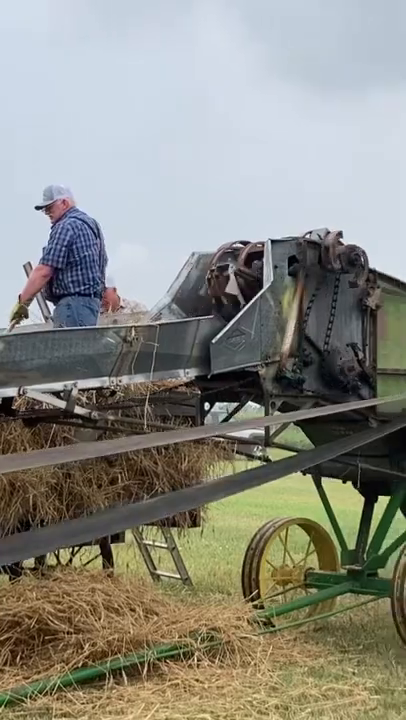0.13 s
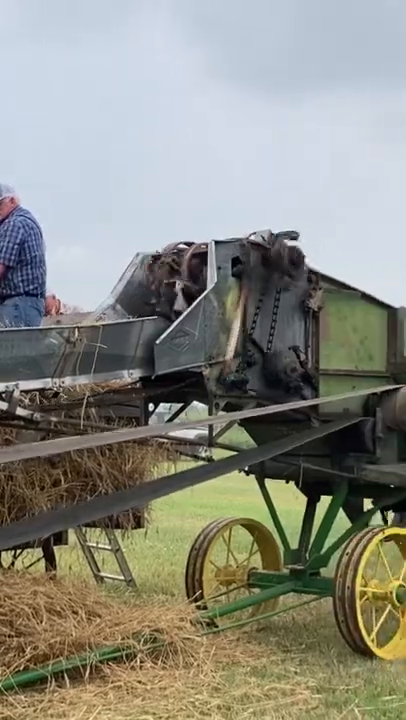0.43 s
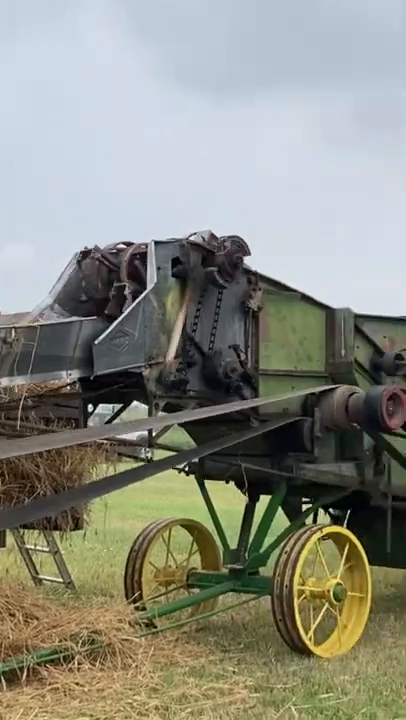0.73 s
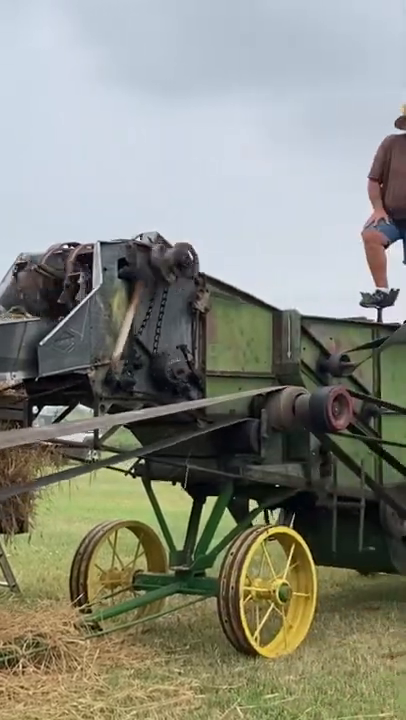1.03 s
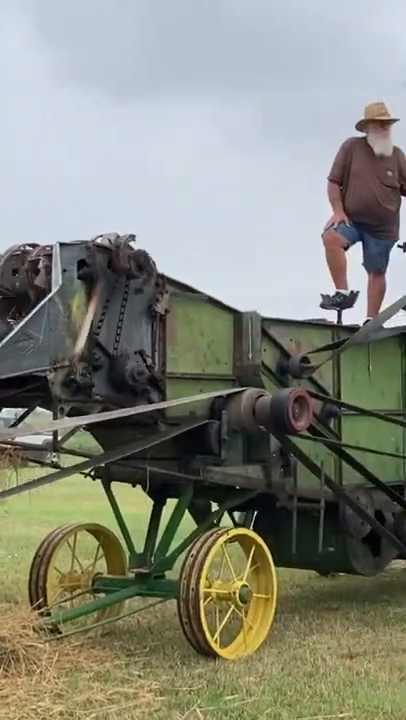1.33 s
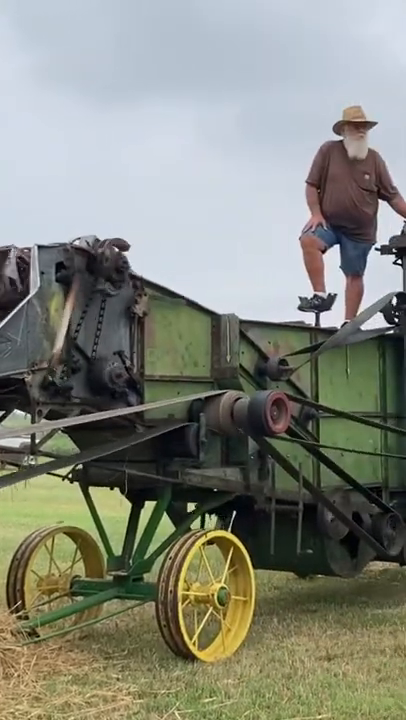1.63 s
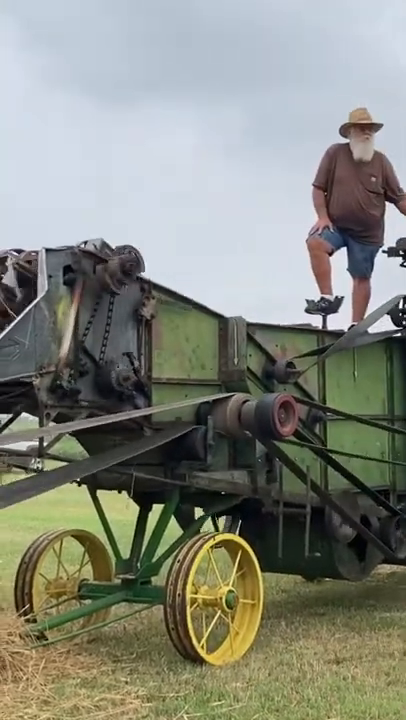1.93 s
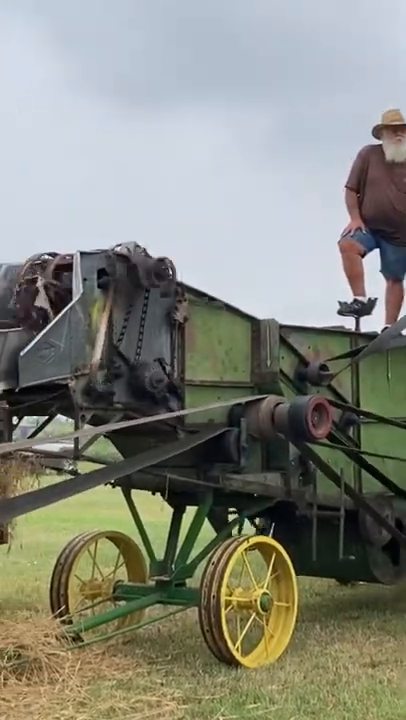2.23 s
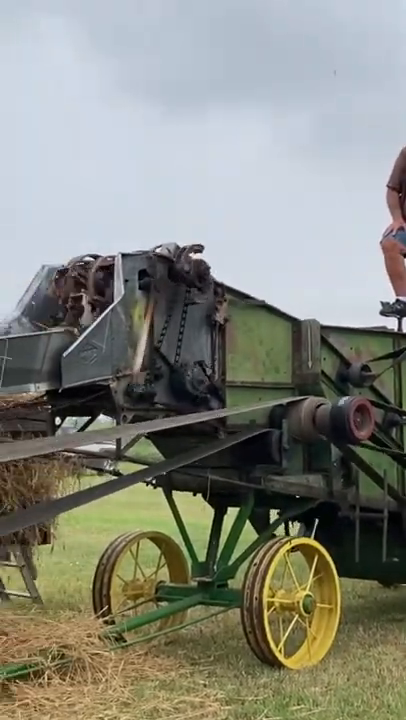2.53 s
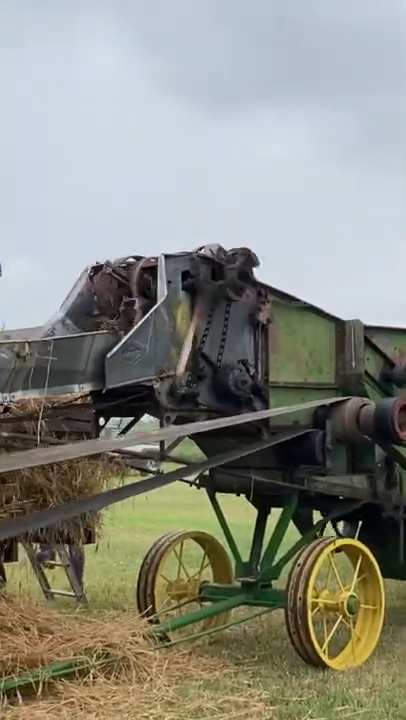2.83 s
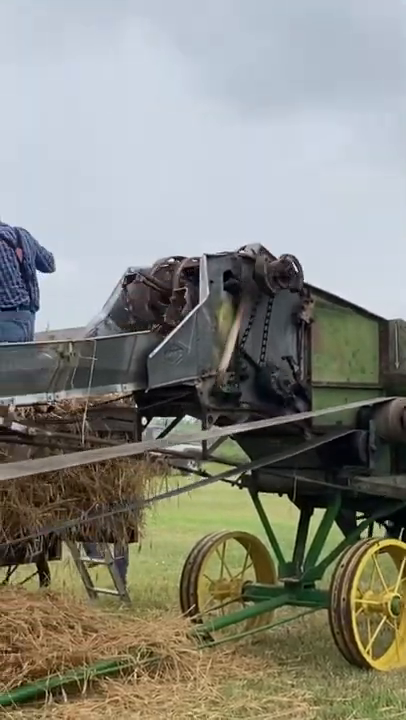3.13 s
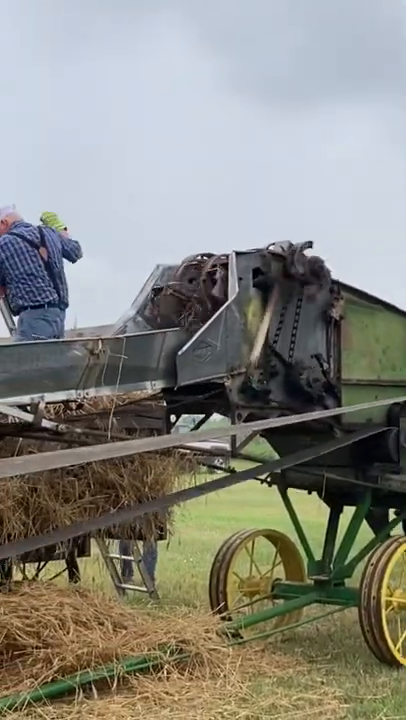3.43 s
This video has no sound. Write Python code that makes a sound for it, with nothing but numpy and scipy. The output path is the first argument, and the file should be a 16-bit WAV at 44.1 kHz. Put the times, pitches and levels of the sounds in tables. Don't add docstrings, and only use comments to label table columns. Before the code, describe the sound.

A threshing machine roars steadily in an open field, low drone throbbing, loose metal rattling, clumps knocking on panels, straw hissing, and a slow engine puffing in uneven pairs; close stereo handheld microphone.

```python
import sys
import numpy as np
from scipy import signal
from scipy.fft import rfft, irfft, next_fast_len
from scipy.io import wavfile

SR = 44100
rng = np.random.default_rng(int(sys.argv[2]) if len(sys.argv) > 2 else 0)


def convert_level_to_amplitude(level_db):
    exponent = np.asarray(level_db, float) / 20
    return 10 ** exponent


def put_to_file(sound):
    columns = np.atleast_2d(sound).T
    safe = np.clip(columns, -1, 1)
    whole_steps = np.round(safe * 32767)
    wavfile.write(sys.argv[1], SR, whole_steps.astype(np.int16))


N = 157878

# (frequency [Hz], width [Hz], level [dB])
PIPE_MODES = [(59.3, 14, -23.5), (100, 45, -35), (40, 14, -45)]
# (time [s], peak [dB])
BARK_EVENTS = [(0.0348, -37), (0.0493, -29), (0.1497, -22), (0.18, -26), (0.2748, -25), (0.3055, -22),
               (0.401, -22), (0.4279, -25), (0.5257, -22), (0.5603, -25), (0.6514, -25), (0.6828, -22.5),
               (0.78, -24.5), (0.8111, -28), (0.9046, -25.5), (0.9394, -21), (1.0311, -24), (1.0635, -26),
               (1.1174, -40), (1.1598, -25), (1.1892, -25), (1.2835, -26), (1.3136, -23.5), (1.4102, -26),
               (1.444, -27.5), (1.506, -34), (1.5389, -28), (1.5704, -30), (1.79, -28), (1.8213, -25),
               (1.953, -33), (2.0463, -26), (2.0766, -25), (2.2039, -23), (2.2965, -21), (2.333, -27),
               (2.4272, -24), (2.4554, -22), (2.5551, -27), (2.585, -24.5), (2.6808, -20), (2.7157, -25),
               (2.8093, -23.5), (2.839, -27), (2.9308, -26), (2.968, -25), (3.06, -27), (3.0914, -33),
               (3.1895, -25.5), (3.2181, -28), (3.2406, -29), (3.3169, -21), (3.3473, -21), (3.4406, -25.5),
               (3.4705, -23.5), (3.5428, -20.5)]
# (frequency [Hz], width [Hz], level [dB])
STACK_MODES = [(375, 320, 6), (1533, 74, 0.5), (1917, 58, 2.5), (2820, 390, 5), (3770, 850, -1)]
# (time [s], rate [Hz], level [dB])
DRUM_SPEED = [
    (0, 60.33, 0),
    (.5, 60.25, 1.5),
    (1.0, 59.9, 0),
    (1.3, 58.9, -3),
    (1.55, 59.7, 0),
    (2.2, 59.8, -1.5),
    (3.6, 59.93, -1.5),
]
# (time [s], rate [Hz], level [dB])
BEATER_SPEED = [(0, 62.42, -3), (3.6, 61.93, 0)]
# (time [s], rate [Hz], level [dB])
FAN_SPEED = [(0, 64.45, -7), (.9, 64.0, -1), (2, 63.88, .5), (3.6, 63.72, -.5)]
# (multiple [ratio], peak [dB]); negative multiple = inverted
DRUM_OVERTONES = [(1, -19.5), (-2, -25.5), (4, -35), (-8, -42)]
BEATER_OVERTONES = [(1, -30), (2, -30), (3, -36)]
FAN_OVERTONES = [(1, -18)]
# (frequency [Hz], density [dB per Hz])
ROAR_SPECTRUM = [(30, -23), (45, -9), (80, -6.5), (281, -15), (520, -21.5), (660, -27.5), (3100, -32),
                 (7000, -36)]
# (frequency [Hz], width [Hz], level [dB])
PANEL_MODES = [(98.3, 38, -31.5), (214.6, 26, -42.5), (391.7, 62, -35), (477, 55, -38.5), (559, 32, -45),
               (950, 344, -37), (1056, 13, -55), (1646, 700, -40.5), (3440, 330, -45), (4150, 1560, -41.5)]
# (frequency [Hz], power share [0-1])
PORT_LIKENESS = [(60, 0.8), (300, 0.91), (550, 0.67), (900, 0.39), (2900, 0.17), (4500, 0.31), (5700, 0.28),
                 (7000, 0.1)]
# (time [s], factor [ratio])
MIC_FACING = [(0, .7), (.6, 1.1), (.95, 1.15), (1.1, .3), (2.0, .3), (2.3, 1.15), (2.6, 1.1), (2.8, .8),
              (3.58, .7)]
# (frequency [Hz], difference [dB])
LEFT_LEAN = [(60, -2), (200, -.5), (700, 1.5), (2400, 0), (4400, -.5), (8000, 0)]
# (time [s], peak [dB], pitch [Hz])
KNOCK_EVENTS = [(0.035, -19, 482), (0.153, -10, 415), (0.312, -19, 350), (0.517, -16.5, 401),
                (0.59, -13.5, 358), (0.692, -21, 355), (0.765, -28, 377), (0.851, -21, 382),
                (1.063, -14, 390), (1.188, -17, 358), (1.217, -29, 423), (1.266, -26, 479),
                (1.336, -16, 476), (1.391, -21, 331), (1.427, -17, 366), (1.481, -18, 401),
                (1.525, -15, 342), (1.56, -29, 396), (1.6, -13, 398), (1.818, -16.5, 380),
                (1.903, -19, 301), (2.062, -21, 471), (2.116, -22, 393), (2.172, -16, 409),
                (2.217, -19, 380), (2.275, -54, 382), (2.329, -15, 466), (2.372, -24, 393),
                (2.432, -24, 398), (2.546, -23, 374), (2.7, -16, 361), (2.763, -20, 301), (2.837, -16, 463),
                (2.939, -15.5, 401), (3.058, -24, 409), (3.124, -17, 450), (3.195, -18, 530),
                (3.311, -23, 331), (3.342, -22, 401), (3.516, -27, 404)]
# (pitch multiple [ratio], level [dB], t60 [s])
HOUSING_MODES = [(1.045, 2, 0.13), (1.22, 1, 0.017), (1, -17, 0.058), (2.8, -20, .03)]
# (time [s], half length [s], frequency [Hz], peak [dB])
SQUEAL_EVENTS = [(0.134, .03, 685, -35), (0.194, .03, 1226, -40), (.3, .04, 1057, -40),
                 (.55, .04, 930, -37), (1.045, 0.045, 712, -40.5), (2.327, 0.034, 909, -38),
                 (2.546, 0.07, 1050, -41), (2.88, 0.034, 563, -30.5), (2.88, .03, 1087, -38),
                 (3.19, 0.022, 530, -31), (3.412, 0.052, 720, -36)]
# (time [s], level [dB])
STRAW_FLOW = [(0.04, -30.5), (0.54, -33.5), (0.61, -32), (0.68, -35), (0.75, -31.5), (0.82, -33),
              (1.33, -30.5), (1.34, -32.5), (1.72, -29), (1.81, -33.5), (1.82, -31), (2.57, -32.5),
              (2.63, -29), (2.83, -32.5), (3.47, -32.5), (3.5, -31)]
# (frequency [Hz], density [dB per Hz])
CHAFF_SPECTRUM = [(3000, -9), (5500, -10), (7000, -4.5), (8000, 9), (9000, 3), (10300, 8.5), (12500, -2.5),
                  (16000, 1)]
# (time [s], peak [dB])
SNAP_EVENTS = [(0.034, -30), (0.2873, -19), (0.3466, -28), (0.393, -26), (0.456, -18), (0.4958, -18),
               (0.6031, -21), (0.621, -21), (0.6465, -9), (0.6918, -18), (0.7313, -20), (0.9423, -18),
               (0.9647, -32), (1.0126, -47), (1.0366, -14), (1.1568, -9), (1.2331, -19), (1.289, -21),
               (1.3129, -16), (1.3608, -19), (1.5444, -29), (1.8243, -21), (1.9071, -11), (2.1061, -46),
               (2.3381, -33), (2.3576, -38), (2.398, -30), (2.4264, -16), (2.4538, -21), (2.4863, -25),
               (2.6175, -30), (2.9203, -17), (2.9722, -41), (3.1024, -25), (3.1792, -24), (3.279, -15),
               (3.3623, -25), (3.4057, -23), (3.4476, -5)]

CYCLE_HZ, FIRST_FIRING_S, SECOND_CYLINDER_SHARE = 7.889, .0228, .25
BARK_LEAD_S, BARK_RISE_S, BARK_FALL_S, BARK_TRIM_DB = .002, .0015, .005, -2.5
DRUM_TURN, BEATER_TURN, FAN_TURN, WAVER_DB = -.12, .06, .15, .4
ROAR_DB, PORT_LAG_S, LAG_FROM_HZ = -23.5, .00046, 1000
KNOCK_TRIM_DB = -8.0
RATTLES_PER_S, RATTLE_DB, RATTLE_CYCLES = 900, -41, 45.0
SQUEAL_SAG_PER_S = .05
CHAFF_LAG_S, CHAFF_TRIM_DB, CHAFF_LIKENESS = .000219, 3, .9
GRAINS_PER_S, GRAIN_DB, GRAIN_SPREAD_DB = 1500, -7, 3.0
SWISH_S, SWISH_LENGTH_S, SWISH_DB = 3.544, .012, 2.5
SNAP_TRIM_DB, SNAP_TOP_DB, SNAP_RISE_S, SNAP_FALL_S = -11, -17, .0012, .0025
BODY_FOLLOWS_FLOW = .47
START_S = .0345


def in_time(rows, axis=1):
    table = np.array(rows)
    return np.interp(np.arange(N) / SR, table[:, 0], table[:, axis])


def at_hz(points, hz):
    table = np.array(points)
    return np.interp(np.log(hz), np.log(table[:, 0]), table[:, 1])


def rms_one(x):
    return x / np.sqrt(np.mean(x ** 2) + 1e-20)


def drift(rate_hz):
    r = np.exp(-80 * np.pi * rate_hz / SR)
    white = rng.standard_normal(N // 40 + 2002)
    slow = signal.lfilter([1], [1, -2 * r, r * r], white)[2000:]
    return np.interp(np.arange(N) / 40, np.arange(len(slow)), rms_one(slow - slow.mean()))


def resonate(x, hz, width_hz):
    r = np.exp(-np.pi * width_hz / SR)
    poles = [1, -2 * r * np.cos(2 * np.pi * hz / SR), r * r]
    return signal.lfilter([(1 - r * r) / 2, 0, (r * r - 1) / 2], poles, x + 1e-18)


def ring(strikes, hz, t60_s):
    r, w = convert_level_to_amplitude(-60 / (t60_s * SR)), 2 * np.pi * hz / SR
    return signal.lfilter([0, np.sin(w)], [1, -2 * r * np.cos(w), r * r], strikes + 1e-18)


def clicks(times_s, sizes):
    return np.bincount((np.asarray(times_s) * SR).astype(int), sizes, N + SR)[:N]


def puffs(train, rise_s, fall_s):
    t = np.arange(SR // 20) / SR
    shape = (1 - np.exp(-t / rise_s)) * np.exp(-t / fall_s)
    return signal.fftconvolve(train, shape / shape.max())[:N]


def late(x, lag_s):
    size = next_fast_len(N + 64)
    hz = np.arange(size // 2 + 1) / size * SR
    return irfft(rfft(x, size) * np.exp(-2j * np.pi * hz * lag_s), size)[:N]


def likeness(hz):
    facing = in_time(MIC_FACING) if hz > LAG_FROM_HZ else 1
    return np.clip(at_hz(PORT_LIKENESS, hz) * facing, 0, 1)


def bands(spectrum, low_hz, high_hz, count, patchy_db, rate_hz):
    edges, together = np.geomspace(low_hz, high_hz, count + 1), drift(rate_hz)
    white = rng.standard_normal((2, 3, N))
    for k, (low, high) in enumerate(zip(edges, edges[1:])):
        hz = np.sqrt(low * high)
        gain = convert_level_to_amplitude(at_hz(spectrum, hz) + patchy_db * (0.69 * together + drift(rate_hz)))
        band = signal.butter(2, [low, high], "band", fs=SR, output="sos")
        yield hz, gain * signal.sosfilt(band, white[k % 2])


def squeals():
    t, out = np.arange(N) / SR, np.zeros(N)
    for s, half_s, hz, db in SQUEAL_EVENTS:
        swell = np.exp(-.5 * ((t - s) / half_s) ** 2)
        out += convert_level_to_amplitude(db) * swell * np.sin(2 * np.pi * hz * (t - SQUEAL_SAG_PER_S * (t - s) ** 2))
    return out


def chaff(flow_db):
    noises = [b for _, b in bands(CHAFF_SPECTRUM, 2476, 18640, count=10, patchy_db=1.5, rate_hz=80.0)]
    hiss = rms_one(sum(noises))
    sizes = convert_level_to_amplitude(GRAIN_SPREAD_DB * np.minimum(rng.exponential(1, N), 5)) * rng.choice([-1, 1], N)
    hits = rng.random(N) < GRAINS_PER_S * convert_level_to_amplitude(4.0 * drift(10.0)) / SR
    bright = signal.butter(2, [5500, 16000], "band", fs=SR, output="sos")
    grains = convert_level_to_amplitude(GRAIN_DB) * rms_one(signal.sosfilt(bright, sizes * hits))
    swish = convert_level_to_amplitude(SWISH_DB) * np.exp(-((np.arange(N) / SR - SWISH_S) / SWISH_LENGTH_S) ** 4)
    level = convert_level_to_amplitude(flow_db + CHAFF_TRIM_DB) * (1 + swish)
    s, db = np.transpose(SNAP_EVENTS)
    train = clicks(s, convert_level_to_amplitude(np.minimum(db, SNAP_TOP_DB) + SNAP_TRIM_DB))
    snaps = puffs(train, SNAP_RISE_S, SNAP_FALL_S) * hiss[0]
    common = level * (np.sqrt(CHAFF_LIKENESS) * hiss[0] + grains) + snaps
    apart = level * np.sqrt(1 - CHAFF_LIKENESS) * hiss[1:]
    return np.array([late(common, CHAFF_LAG_S), -common]) + apart


def rattles():
    sizes = convert_level_to_amplitude(3.3 * np.minimum(rng.exponential(1, N), 4))
    hits = sizes * (rng.random(N) < RATTLES_PER_S * convert_level_to_amplitude(4.0 * drift(7.0)) / SR)
    dealt, out = rng.integers(0, 24, N), np.zeros((2, N))
    for k, hz in enumerate(np.geomspace(850, 6500, 24)):
        out[k % 2] += ring(hits * (dealt == k), hz, RATTLE_CYCLES / hz)
    left, right = out[0], late(out[1], PORT_LAG_S)
    mix = np.array([left + .7 * right, right + .7 * late(left, 2 * PORT_LAG_S)])
    return convert_level_to_amplitude(RATTLE_DB) * rms_one(mix)


def knocks():
    out, length = np.zeros(N + SR), SR // 4
    luck_db = rng.normal(0, 2, (len(KNOCK_EVENTS), len(HOUSING_MODES)))
    blow = signal.lfilter([.1, -.1], [1, -1.88, .882], np.arange(length) == 0)
    for (s, db, hz), odds in zip(KNOCK_EVENTS, luck_db):
        start = int(s * SR)
        for (ratio, mode_db, t60_s), odd_db in zip(HOUSING_MODES, odds):
            gain = convert_level_to_amplitude(db + KNOCK_TRIM_DB + mode_db + odd_db)
            out[start:start + length] += gain * ring(blow, hz * ratio, t60_s)
    return out[:N]


def panels():
    out = np.zeros((2, N))
    for hz, width_hz, db in PANEL_MODES:
        common, a, b = rng.standard_normal((3, N))
        like = likeness(hz)
        right = late(common, PORT_LAG_S * (hz > LAG_FROM_HZ))
        mix = np.sqrt(like) * np.array([common, right]) + np.sqrt(1 - like) * np.array([a, b])
        hum = resonate(resonate(mix, hz, width_hz), hz, width_hz)
        out += convert_level_to_amplitude(db + 0.88 * drift(7.1)) * rms_one(hum)
    return out


def roar():
    left, right, right_late = np.zeros((3, N))
    noises = bands(ROAR_SPECTRUM, 29.6, 8030, count=20, patchy_db=1.4, rate_hz=24.0)
    for hz, (common, a, b) in noises:
        like, lean = likeness(hz), convert_level_to_amplitude(at_hz(LEFT_LEAN, hz) / 2)
        shared = np.sqrt(like) * common
        left += lean * (shared + np.sqrt(1 - like) * a)
        right += np.sqrt(1 - like) * b / lean
        target = right_late if hz > LAG_FROM_HZ else right
        target += shared / lean
    return convert_level_to_amplitude(ROAR_DB) * rms_one(np.array([left, right + late(right_late, PORT_LAG_S)]))


def exhaust_bark():
    s, db = np.transpose(BARK_EVENTS)
    train = clicks(s - BARK_LEAD_S, convert_level_to_amplitude(db + BARK_TRIM_DB))
    gas = puffs(train, BARK_RISE_S, BARK_FALL_S) * rng.standard_normal(N)
    out = np.zeros(N)
    for k, (hz, width_hz, mode_db) in enumerate(STACK_MODES):
        gain = convert_level_to_amplitude(mode_db) * np.sqrt(SR / 20 / width_hz)
        out += (-1) ** k * gain * resonate(gas, hz, width_hz)
    return out


def firings():
    first = FIRST_FIRING_S + np.arange(-2, 29) / CYCLE_HZ
    s = np.concatenate([first, first + SECOND_CYLINDER_SHARE / CYCLE_HZ])
    return s[s > 0]


def exhaust_thud():
    s = firings()
    train = clicks(s, convert_level_to_amplitude(rng.normal(0, 0.5, len(s))) * SR / CYCLE_HZ)
    out = np.zeros(N)
    for k, (hz, width_hz, db) in enumerate(PIPE_MODES):
        sense = 1 if k == 0 else -1
        out += sense * convert_level_to_amplitude(db - 12) * resonate(resonate(train, hz, width_hz), hz, width_hz)
    return out


def rotor(speed, turn, overtones):
    phase = 2 * np.pi * (np.cumsum(in_time(speed)) / SR + turn)
    out = np.zeros(N)
    for k, db in overtones:
        out += np.sign(k) * convert_level_to_amplitude(db + WAVER_DB * drift(6.0)) * np.cos(k * phase)
    return convert_level_to_amplitude(in_time(speed, axis=2)) * out


def drone():
    drum = rotor(DRUM_SPEED, DRUM_TURN, DRUM_OVERTONES)
    beater = rotor(BEATER_SPEED, BEATER_TURN, BEATER_OVERTONES)
    fan = rotor(FAN_SPEED, FAN_TURN, FAN_OVERTONES)
    return drum + beater + fan


def scene():
    flow_db = in_time(STRAW_FLOW)
    shake = convert_level_to_amplitude(BODY_FOLLOWS_FLOW * (flow_db - flow_db.mean()))
    body = shake * (roar() + panels() + rattles())
    low = (exhaust_thud() + drone()) * convert_level_to_amplitude(np.array([[-1.0], [1.0]]))
    bark = exhaust_bark()
    engine = np.array([bark, late(bark, PORT_LAG_S)])
    belts = squeals() * convert_level_to_amplitude(np.array([[3.0], [-3.0]]))
    return low + engine + knocks() + belts + body + chaff(flow_db)


def band_limit(x):
    return signal.sosfilt(signal.butter(12, 15750, fs=SR, output="sos"), x)


def record(dry):
    gate = np.clip((np.arange(N) / SR - START_S) / .002, .0015, 1)
    return band_limit(dry * gate)


dry = scene()
out = record(dry)
put_to_file(out)
```